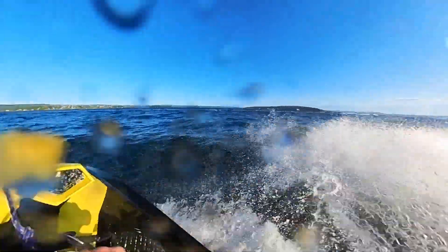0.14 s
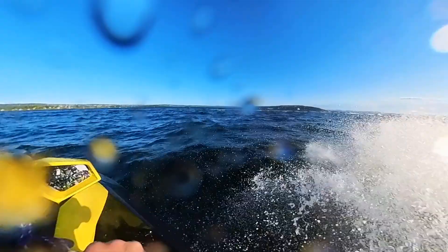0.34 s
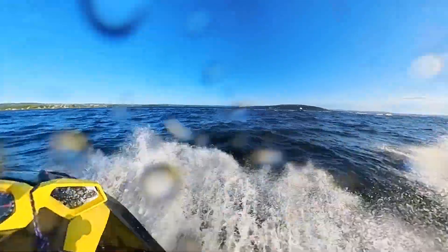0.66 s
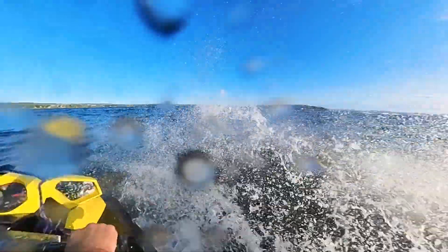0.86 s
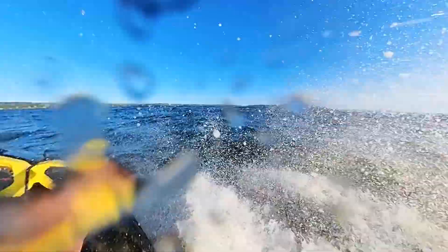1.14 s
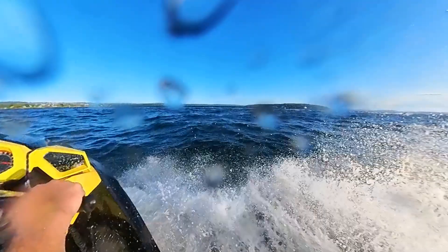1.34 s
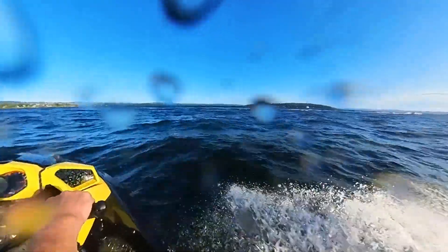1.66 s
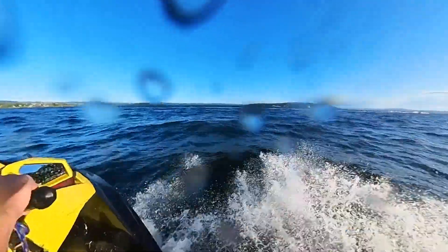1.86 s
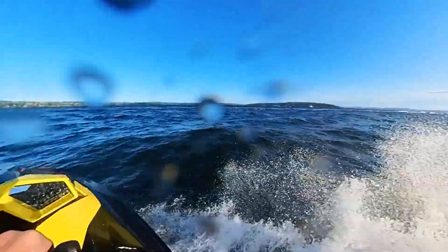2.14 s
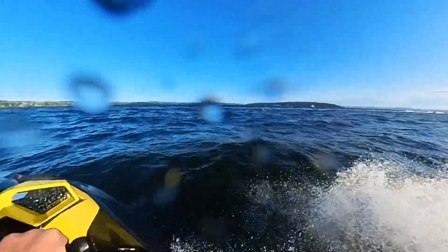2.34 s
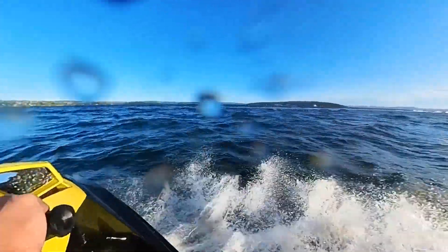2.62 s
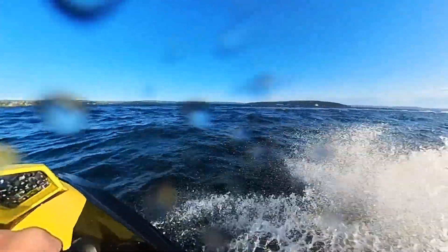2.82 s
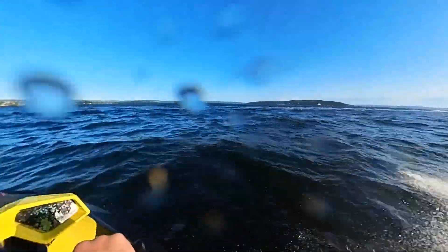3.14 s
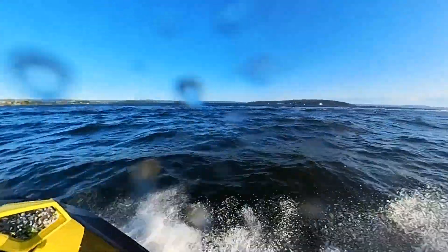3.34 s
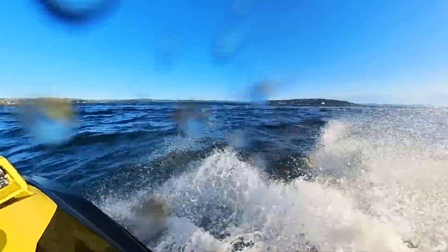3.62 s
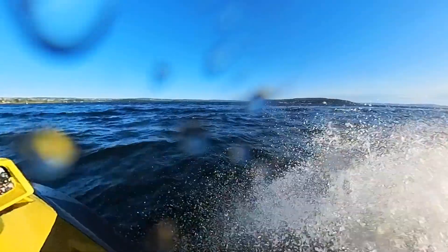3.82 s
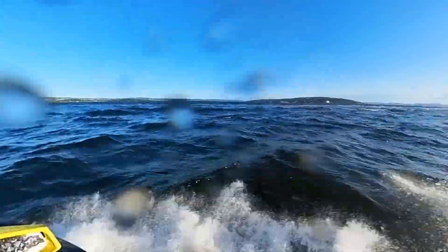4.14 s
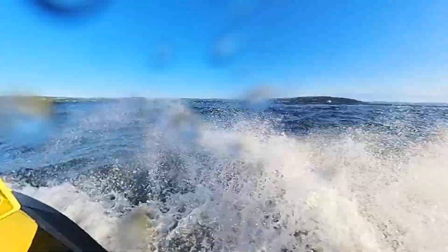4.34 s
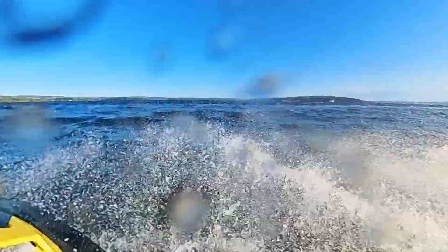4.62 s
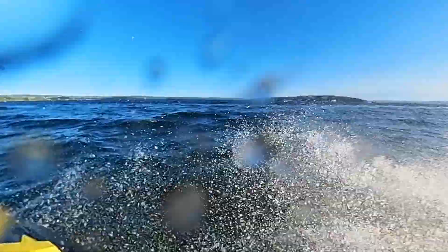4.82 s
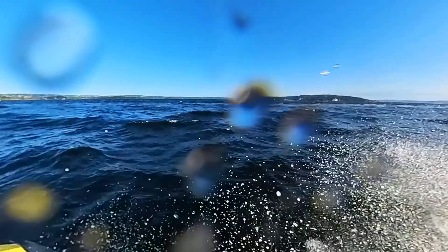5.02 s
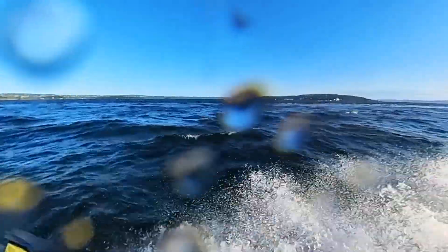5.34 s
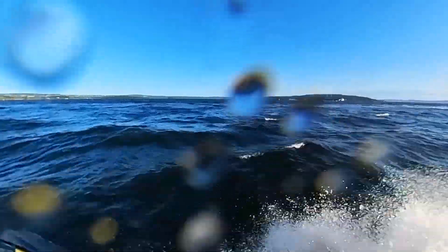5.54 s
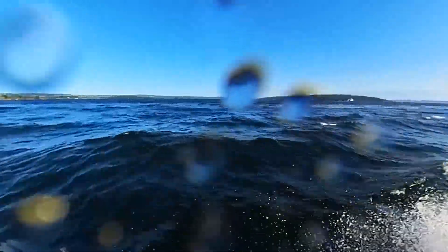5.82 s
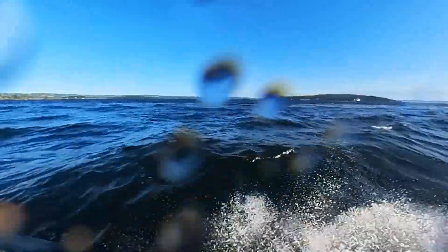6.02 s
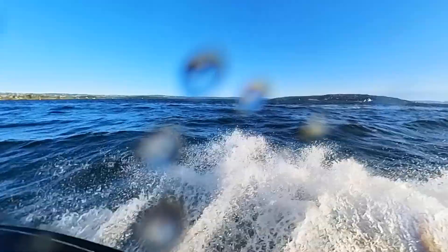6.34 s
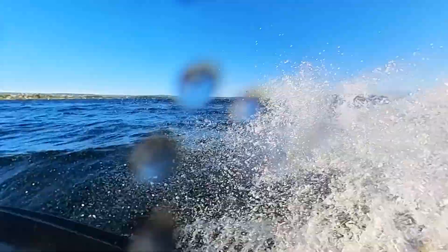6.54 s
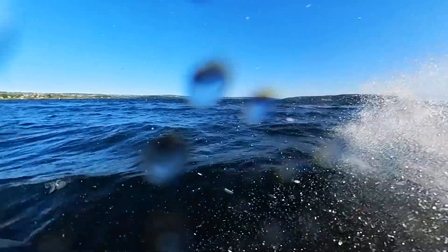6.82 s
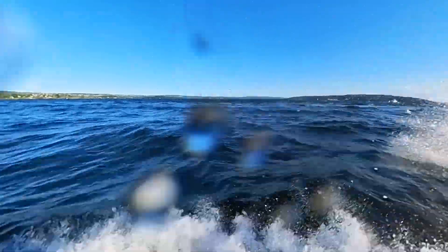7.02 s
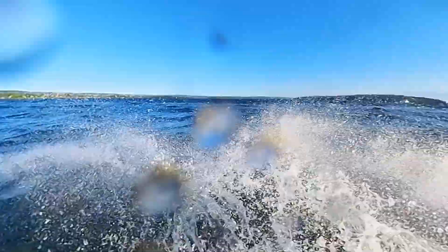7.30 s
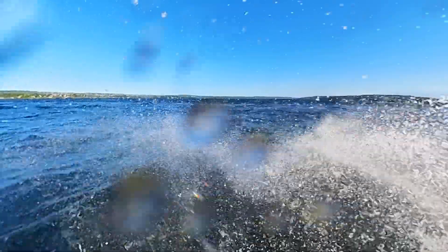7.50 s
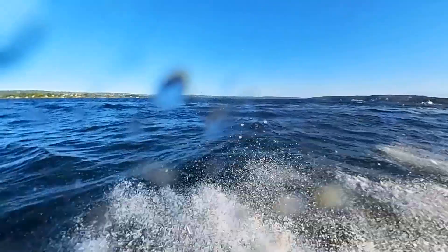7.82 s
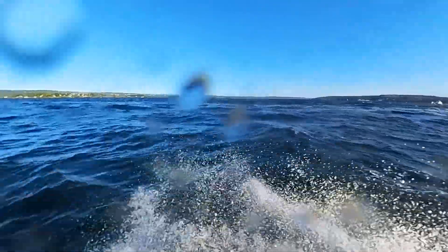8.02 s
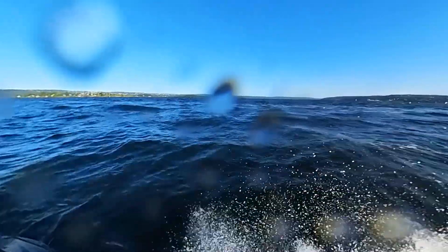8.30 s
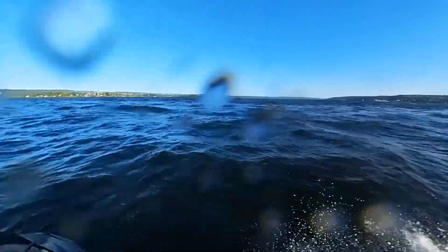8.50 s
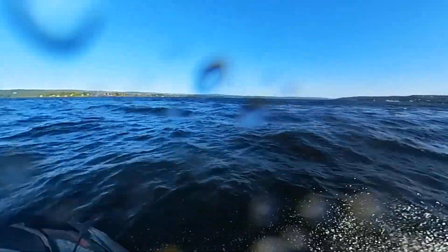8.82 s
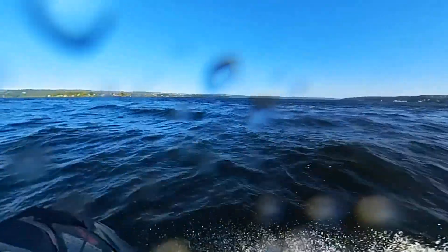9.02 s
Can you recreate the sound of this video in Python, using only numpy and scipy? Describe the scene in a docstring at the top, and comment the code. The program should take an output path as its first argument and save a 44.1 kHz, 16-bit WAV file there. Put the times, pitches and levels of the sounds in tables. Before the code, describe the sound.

A personal watercraft speeds over choppy water, its engine droning and briefly racing amid wind buffeting, dull hull slaps, heavy thuds and faint hissing spray.

```python
"""Personal watercraft on choppy water

It runs fast, heard through a microphone in a waterproof housing on board. The three-cylinder engine
drones as a stack of sine waves and at times races as the jet pump draws air. Shaped noise makes the
wind, the churning chop and the hissing spray. Short fading tones make the slaps against the hull,
its thuds on waves and, mixed with noise, the ticks of drops."""
import sys
import numpy as np
from scipy import signal
from scipy.fft import rfft, irfft, next_fast_len
from scipy.io import wavfile

SR = 44100
rng = np.random.default_rng(int(sys.argv[2]) if len(sys.argv) > 2 else 0)


def persist_wave(psi):
    """Save psi, clipped to +-1, as 16-bit WAV."""
    counts = np.round(np.clip(psi, -1, 1) * 32767).astype(np.int16)
    wavfile.write(sys.argv[1], SR, np.atleast_2d(counts).T)


N = 403956  # samples in the scene

# Engine speed while the pump grips, before races and wobble: [t/s, four-stroke cycle rate f/Hz]
GRIP_SPEED = [(0, 38.5), (0.3, 35.2), (0.47, 36.8), (0.72, 35.4), (0.85, 31.8), (1.0, 35.2), (1.1, 33.3),
              (1.22, 32.4), (1.45, 32.7), (1.62, 37.5), (2.05, 37.3), (2.5, 38.7), (2.94, 38.3),
              (3.2, 35.9), (3.6, 35.3), (4.06, 35.4), (4.3, 35), (4.45, 34), (4.54, 35.3), (4.65, 33.3),
              (5.52, 32.1), (5.73, 34.2), (6.1, 32.2), (6.35, 33), (6.5, 34), (6.75, 33.3), (6.92, 32.4),
              (7.22, 38), (7.36, 35.4), (7.46, 36.2), (7.7, 31.8), (7.85, 38.5), (8.0, 40), (8.2, 38.2),
              (9.16, 38.2)]
# The pump draws air and the engine races: [peak t/s, time from peak to 37 % t/s, added cycle rate f/Hz]
RACES = [(0.1, .1, 3), (1.77, .12, 3), (4.23, .06, 6), (5.11, .16, 8.8)]
# The outlet comes clear of the water and the drone swells: [start t/s, end t/s, gain level/dB]
SWELLS = [(0.06, 0.17, 11), (0.38, 0.78, 6), (1.0, 1.54, 5.5), (3.1, 3.55, 1.5), (3.55, 4.16, 6.5),
          (4.53, 4.66, 8.5), (5.32, 5.45, 10), (5.55, 5.88, 5), (5.88, 6.68, 7.5), (6.68, 6.98, 10),
          (7.33, 7.65, 4.5), (7.8, 8.08, 9.5), (8.08, 8.92, 2), (8.92, 9.16, 10)]
# The hull lifts and the exhaust booms on multiple 4: [start t/s, end t/s, gain level/dB]
BOOMS = [(0.43, 0.8, 15), (3.12, 3.33, 13.5), (3.95, 4.26, 16), (5.05, 5.21, 18.5), (7.06, 7.14, 17.5),
         (8.27, 8.37, 18)]
# The pump grips evenly and the firing note stands out: [start t/s, end t/s, gain level/dB]
THROBS = [(2.75, 3.05, 4), (7.95, 9.0, 3.5)]
# The pump bites again and the exhaust pipe barks on one line:
# [start t/s, end t/s, multiple of the cycle rate, line level/dB before the shake]
BARKS = [(1.035, 1.102, 8, -21), (1.08, 1.547, 9, -30), (3.604, 4.12, 8, -27.5), (4.4, 4.477, 8, -19.5),
         (4.577, 4.705, 9, -26), (6.5, 6.903, 8, -33.5), (6.96, 7.08, 9, -28.5), (7.583, 7.78, 9, -23),
         (8.8, 9.08, 8, -28)]
# Weaker exhaust lines: [multiple of the cycle rate, level/dB before swells and shake]
OVERTONES = [(5, -43.5), (7, -48.5), (10, -45), (12, -50)]

# Air over the microphone, low buffeting before its overall shift and gusts: [t/s, level/dB]
BUFFETING = [(0, -14), (0.65, -30.5), (0.92, -24.5), (1.0, -29), (1.2, -23), (1.55, -24.5), (1.9, -24),
             (2.15, -24.5), (2.48, -29.5), (2.57, -33), (2.66, -21.5), (2.76, -33), (2.86, -23.5),
             (3.25, -21), (3.68, -29), (3.91, -24.5), (4.0, -26.5), (4.42, -26.5), (4.72, -28.5),
             (4.92, -20), (5.2, -30), (5.44, -23), (5.64, -31.5), (5.76, -25.5), (6.3, -28), (6.45, -31.5),
             (6.7, -21), (7.04, -28), (7.34, -23), (7.55, -27.5), (7.83, -23), (8.14, -30), (8.31, -26),
             (9.16, -28.5)]
# Eddies breaking on the port, fine turbulence before its overall shift and gusts: [t/s, level/dB]
EDDIES = [(0.0, -28), (0.81, -35), (0.87, -31), (1.02, -42.5), (1.17, -31), (2.13, -30.5), (2.7, -35.5),
          (3.21, -31.5), (3.42, -36.5), (3.62, -37), (3.96, -31), (4.02, -42.5), (4.17, -45), (4.26, -30.5),
          (4.32, -35), (4.74, -36), (4.92, -22.5), (5.04, -34.5), (5.58, -32), (5.64, -35), (6.09, -31),
          (6.42, -37), (6.48, -34.5), (7.23, -33), (7.56, -39.5), (7.86, -29.5), (8.07, -35), (8.25, -31),
          (9.15, -33)]

# Slaps of chop and water, before muffling and limiter: [t/s, level/dB, pressure pulse f/Hz]
SLAPS = [(0.230, -13, 850), (0.897, -15, 950), (1.069, -15, 800), (1.082, -11.5, 890), (1.180, -12, 750),
         (1.221, -13, 600), (1.275, -12, 900), (1.291, -13, 1020), (1.471, -14.5, 1100), (1.689, -12, 900),
         (1.741, -13.5, 700), (1.775, -10, 650), (1.972, -14, 1000), (1.986, -9.5, 900),
         (2.002, -9.5, 1000), (2.022, -12.5, 820), (2.064, -11, 1100), (2.109, -14, 1200),
         (2.136, -14, 900), (2.155, -11, 1000), (2.225, -10.5, 1150), (2.246, -13, 1200), (2.488, -14, 900),
         (2.682, -8, 900), (2.904, -7, 830), (2.954, -14, 850), (3.018, -13.5, 750), (3.040, -13.5, 650),
         (3.080, -15, 950), (3.198, -5.5, 1000), (3.211, -11, 1100), (3.249, -11, 1300),
         (3.306, -11.5, 900), (3.319, -11, 1100), (3.851, -9.5, 1000), (3.936, -11.5, 950),
         (4.242, -14, 750), (4.256, -11, 1300), (4.277, -13.5, 450), (4.576, -14, 650), (4.615, -9, 1000),
         (4.728, -14.5, 800), (4.894, -7.5, 880), (4.908, -14, 1100), (4.922, -8.5, 780), (4.959, -8, 650),
         (5.086, -9.5, 800), (5.139, -18, 1450), (5.173, -11, 1200), (5.348, -11, 1204),
         (5.455, -13.5, 950), (5.548, -12, 650), (6.333, -6, 380), (6.488, -16, 850), (6.496, -13.5, 1000),
         (6.724, -13, 750), (6.760, -12, 850), (6.890, -13, 905), (6.985, -13.5, 1060), (7.007, -12, 750),
         (7.137, -13.5, 900), (7.246, -13.5, 1000), (7.298, -11.5, 950), (7.620, -14, 1300),
         (7.889, -6.5, 850), (8.645, -13.5, 830), (9.050, -10.5, 1112), (9.076, -12.5, 770)]
# The hull lands on a wave, peak before the limiter: [t/s, level/dB, f/Hz]
THUDS = [(0.745, -13, 250), (0.768, -11, 180), (2.474, -11, 200), (2.636, -8, 260), (2.679, -9, 230),
         (5.166, -10, 140), (6.035, -11, 340), (6.33, -5, 170), (7.819, -11, 240)]

# Sheets of spray from the bow, hiss before its overall shift: [start t/s, length t/s, level/dB]
SHEETS = [(0, 0.09, -56), (0.357, 0.71, -66), (1.14, 0.26, -60), (1.594, 0.34, -61.5), (2.198, 0.84, -65.5),
          (3.195, 0.47, -67.5), (3.569, 0.076, -64.5), (3.7, 0.1, -67.5), (4.27, 0.25, -69), (4.8, .6, -66),
          (5.905, 0.2, -67.5), (6.43, 0.21, -72), (7.128, 0.15, -65.5), (7.615, .2, -64),
          (7.951, 0.23, -70.5), (8.204, .82, -63)]
# Showers of drops after a hard landing, level of the droplets: [start t/s, end t/s, level/dB]
SHOWERS = [(1.09, 1.48, -60), (4.73, 5.45, -64.5), (7.56, 8.0, -65.5)]
# Drops on the housing, starting level before the filter: [t/s, level/dB]
DROPS = [(1.070, -53), (1.143, -47), (1.166, -43), (1.417, -44), (2.474, -48), (4.788, -42), (4.929, -47),
         (4.939, -48), (5.0, -44), (5.087, -49), (5.174, -44), (6.015, -50), (6.735, -51), (7.616, -45),
         (7.699, -48), (7.731, -45), (7.909, -46), (7.957, -48)]
# Water squeezing through the microphone port, before shift and wobble: [t/s, f/Hz, level/dB]
SQUEAK = [(4.33, 6640, -98), (4.355, 6540, -65), (4.37, 6540, -62), (4.39, 7420, -76), (4.405, 6606, -62),
          (4.45, 5843, -73), (4.47, 5740, -120)]

# Colours of the noises; only the shape counts, as the power is evened out: [f/Hz, relative level/dB]
RUMBLE_COLOUR = [(20, -25), (32, -18.5), (45, 4.5), (62, 4), (80, 2), (110, -6), (170, -15), (300, -22.5),
                 (600, -54)]
BUFFET_COLOUR = [(60, -26.5), (100, -2), (160, 2), (260, 0), (330, -3.5), (480, -7.5), (680, -18),
                 (1200, -27), (2500, -59)]
TURBULENCE_COLOUR = [(200, -30.5), (450, 6.5), (650, 4.5), (1000, 1), (1430, -4), (1550, -11), (2000, -25),
                     (2500, -43), (3000, -42.5), (3600, -49), (6000, -60.5)]
HISS_COLOUR = [(900, -5.5), (1800, 14.5), (2400, 1), (2900, -14.5), (3500, 2.5), (4000, -3), (4700, -3.5),
               (5300, -7.5), (6300, -10), (7200, -21.5), (10000, -28.5), (15000, -40)]
MIST_COLOUR = [(3000, -20.5), (6000, -3.5), (7500, 2), (9300, 5.5), (11000, -1), (14000, -3),
               (16000, -10.5)]
WASH_COLOUR = [(250, -10.5), (600, 8), (1000, 6), (1450, -10.5), (2000, -23), (2600, -31), (3200, -43)]


def from_db(db):
    """Turn decibels into a gain."""
    return 10 ** (np.asarray(db) / 20)


def rms_one(x):
    """Scale to unit power."""
    return x / np.sqrt(np.mean(x ** 2) + 1e-20)


def clock():
    """Time of every sample in seconds."""
    return np.arange(N) / SR


def in_time(rows):
    """Draw a curve through each column, one value per sample."""
    s, *columns = np.transpose(rows)
    return [np.interp(clock(), s, column) for column in columns]


def held(rows, fade_s):
    """Each row fades in, holds its value and fades out."""
    t = clock()
    return sum(value * np.clip(.5 + np.minimum(t - start, end - t) / fade_s, 0, 1)
               for start, end, value in rows)


def drift(rate_hz):
    """Smooth random wander with spread 1, made at an eighth of the sample rate."""
    r = np.exp(-16 * np.pi * rate_hz / SR)
    noise = rng.standard_normal(N // 8 + 8002)
    slow = signal.lfilter([1], [1, -2 * r, r * r], noise)[8000:]  # skip the filter's settling
    return np.interp(np.arange(N) / 8, np.arange(len(slow)), rms_one(slow))


def cut(x, hz, kind, order=2):
    """Butterworth filter: keep only a range of pitches."""
    sections = signal.butter(order, hz, kind, fs=SR, output="sos")
    return signal.sosfilt(sections, x + 1e-18)


def colour(x, spectrum):
    """Give a noise its spectrum, at unit power."""
    hz, db = np.transpose(spectrum)
    size = next_fast_len(N)
    bins = np.maximum(np.arange(size // 2 + 1) * SR / size, 1)
    # nothing is left outside the listed range
    gain = from_db(np.interp(np.log(bins), np.log(hz), db, left=-np.inf, right=-np.inf))
    return rms_one(irfft(rfft(x, size) * gain, size)[:N])


def white():
    """Plain noise."""
    return rng.standard_normal(N)


def grains(per_s, spread_db):
    """Random clicks of uneven size, at unit power."""
    sizes = from_db(spread_db * np.minimum(rng.exponential(1, N), 4))
    signs = rng.choice([-1, 1], N)
    struck = rng.random(N) < per_s / SR
    return rms_one(sizes * signs * struck)


def resonance_db(hz, centre_hz, width_hz):
    """Loss of a line that lies off the centre of a resonance."""
    return -10 * np.log10(1 + ((hz - centre_hz) / width_hz) ** 2)


def engine(firing_db=-30.0, firing_hz=116, firing_width_hz=10, fourth_db=-40.5,
           drone_db=-28.5, drone_hz=203, drone_width_hz=22, pipe_db=-39,
           overtone_follows=0.32, shake_db=1.0, wobble=0.004):
    """Exhaust lines locked to the crank; unequal cylinders fill in between the firing harmonics."""
    t = clock()
    cycle_hz = in_time(GRIP_SPEED)[0]
    for s, width, extra in RACES:
        cycle_hz = cycle_hz + extra * np.exp(-((t - s) / width) ** 2)
    turn = 2 * np.pi * np.cumsum(cycle_hz * (1 + wobble * drift(21))) / SR
    swell = held(SWELLS, fade_s=0.056)
    boom = held(BOOMS, fade_s=0.07)
    throb = held(THROBS, fade_s=0.06)

    # two exhaust resonances favour the firing note (3) and the drone (6) as they pass through
    firing = firing_db + throb + resonance_db(3 * cycle_hz, firing_hz, firing_width_hz)
    drone = drone_db + swell + resonance_db(6 * cycle_hz, drone_hz, drone_width_hz)
    lines = [(3, firing), (4, fourth_db + boom), (6, drone)]
    for k in (8, 9):
        barks = [(start, end, db - pipe_db) for start, end, multiple, db in BARKS
                 if round(multiple) == k]
        lines.append((k, pipe_db + held(barks, fade_s=0.05)))
    lines += [(round(k), db + overtone_follows * swell) for k, db in OVERTONES]

    out = np.zeros(N)
    for k, db in lines:
        level = from_db(db + shake_db * drift(26.0))  # water washing over the outlet shakes each line
        out += level * np.sin(k * turn + rng.uniform(0, 2 * np.pi))
    return np.sqrt(2) * out


def wind(buffet_db=5.0, turbulence_db=-2.5, pop_db=-4.0, rumble_db=-33.5, rumble_share=0.55,
         gust_db=0.9, lump_db=2.6, burst_db=2.8):
    """Eddies strike the port: each swells the low buffeting and bursts into turbulence and pops."""
    body, = in_time(BUFFETING)
    fine, = in_time(EDDIES)
    gust = from_db(gust_db * drift(10))
    eddies = np.clip(drift(40), -2.5, 1.6)
    # the rumble partly follows the turbulence
    rumble_level = from_db(rumble_db + rumble_share * (fine - fine.mean()))
    rumble = rumble_level * colour(white(), RUMBLE_COLOUR)
    buffet = colour(white() * from_db(lump_db * eddies), BUFFET_COLOUR)
    pops = from_db(pop_db) * grains(per_s=110, spread_db=1.0)
    bursts = (white() + pops) * from_db(burst_db * eddies)
    turbulence = colour(bursts, TURBULENCE_COLOUR)
    return rumble + gust * (from_db(body + buffet_db) * buffet
                            + from_db(fine + turbulence_db) * turbulence)


def slaps(thump_hz=330, thump_s=0.005, splash_s=0.0055):
    """A quickly fading pressure pulse, a dull hull thump and a ragged splash, muffled by the housing."""
    out, t = np.zeros(N), np.arange(SR // 15) / SR
    ragged = from_db(3 * np.clip(drift(120), -2, 1.3))
    for s, db, hz in SLAPS:
        at = round(s * SR)
        hull_hz = thump_hz * rng.uniform(.8, 1.6)  # a different patch of hull each time
        thump = from_db(-3) * np.sin(2 * np.pi * hull_hz * t) * np.exp(-t / thump_s)
        # the fade is set to 1 at a quarter cycle, the first crest
        pulse = from_db(-1.5) * np.sin(2 * np.pi * hz * t) * np.exp(-1.2 * (hz * t - .25))
        noise = rng.standard_normal(len(t)) * ragged[at:at + len(t)]
        splash = cut(noise, [300, 1400], "band") * np.exp(-t / splash_s)
        out[at:at + len(t)] += from_db(db) * (pulse + thump + splash)
    muffled = cut(out, 1700, "low", order=4)
    return cut(muffled, 2800, "low", order=6)


def thuds(cycles=1.6):
    """The hull lands on a wave: a low knock that swells and dies within a few cycles."""
    out, t = np.zeros(N), np.arange(SR // 10) / SR
    for s, db, hz in THUDS:
        at = round(s * SR)
        age = 2 * hz * t / cycles  # 1 at the fullest moment
        out[at:at + len(t)] += from_db(db) * age * np.exp(1 - age) * np.sin(2 * np.pi * hz * t)
    return out


def chop(wash_db=-46.5, gather_s=0.025, settle_s=0.029):
    """Water gathers before each slap, then churns and pops along the hull; harder slaps throw more."""
    t = clock()
    typical_db = np.mean([db for s, db, hz in SLAPS])
    power = np.zeros(N)
    for s, db, hz in SLAPS:
        distance = np.maximum((s - t) / gather_s, (t - s) / settle_s)
        power += from_db(db - typical_db) * np.exp(-distance)
    pops = from_db(3) * grains(per_s=220, spread_db=1.5)
    return from_db(wash_db) * np.sqrt(power) * colour(white() + pops, WASH_COLOUR)


def spray(hiss_db=11.0, mist_db=-13.0, patter_db=-12.0, flicker_db=0.6, mist_growth=.25,
          wake_db=-68.5, attack_s=0.12, release_s=0.12):
    """Sheets of spray rise, hold and fall over the wake's hiss; heavier ones carry more fine mist."""
    t = clock()
    power = from_db(wake_db) ** 2
    for s, length, db in SHEETS:
        rise = np.clip(1 + (t - s) / attack_s, 0, 1)  # full at the listed start
        fall = np.exp(-np.maximum(t - s - length, 0) / release_s)
        power = power + (from_db(db) * rise * fall) ** 2
    hiss = 10 * np.log10(power)
    mist = hiss + mist_db + mist_growth * (hiss - hiss.mean())
    flicker = from_db(flicker_db * drift(31))
    patter = from_db(patter_db) * grains(per_s=330, spread_db=1.0)
    sheet = from_db(hiss + hiss_db) * colour(white() + .7 * patter, HISS_COLOUR)
    return flicker * (sheet + from_db(mist) * colour(white() + patter, MIST_COLOUR))


def showers(film_db=-1.0, droplet_top_hz=5200):
    """Thrown water falls as dense droplets and runs off the housing in a fizzing film."""
    t = clock()
    fall = np.zeros(N)
    for start, end, db in SHOWERS:
        swell = np.clip((t - start) / .07, 0, 1)
        thin_out = np.clip(4 * (end - t) / (end - start), 0, 1)  # over the last quarter
        fall += from_db(db) * swell * thin_out
    patter = grains(per_s=330, spread_db=3.3)
    droplets = rms_one(cut(patter, [2000, droplet_top_hz], "band"))
    fizz = white() * from_db(3 * np.clip(drift(60), -2, 2))
    film = rms_one(cut(fizz, [2000, 3600], "band"))
    return fall * (droplets + from_db(film_db) * film)


def drops(decay_s=0.0024, squeak_db=-2.5):
    """Drops tick on the housing, each ringing at its own pitch; once a water film squeaks in the port."""
    ticks, t = np.zeros(N), np.arange(SR // 50) / SR
    for s, db in DROPS:
        at = round(s * SR)
        ring = np.sin(2 * np.pi * rng.uniform(3500, 5000) * t)
        tick = (ring + rng.standard_normal(len(t))) / np.sqrt(2)
        ticks[at:at + len(t)] += from_db(db) * np.exp(-t / decay_s) * tick
    hz, db = in_time(SQUEAK)
    turn = 2 * np.pi * np.cumsum(hz * (1 + .025 * drift(200))) / SR
    squeak = from_db(db + squeak_db + 4 * drift(90)) * np.sin(turn)
    started = clock() > SQUEAK[0][0]
    return cut(ticks, [2800, 8500], "band") + squeak * started


def scene():
    """Everything meets at one microphone."""
    craft = engine() + wind() + slaps() + thuds()
    water = chop() + spray() + showers() + drops()
    return (craft + water)[None]


def record(dry, threshold_db=-10.5, release_db_per_s=75, attack_s=0.0009, cutoff_hz=15100):
    """A limiter ducks everything at loud peaks and recovers quickly; the highest treble is cut."""
    over = np.maximum(20 * np.log10(np.abs(dry) + 1e-9) - threshold_db, 0)
    # a running maximum on a rising ramp makes each peak fall back at a steady rate
    ramp = release_db_per_s * np.arange(N) / SR
    falling = np.maximum.accumulate(over + ramp, axis=-1) - ramp
    duck_db = cut(falling, 1 / (2 * np.pi * attack_s), "low")
    top_cut = signal.ellip(10, .1, 70, cutoff_hz, fs=SR, output="sos")
    return signal.sosfilt(top_cut, dry * from_db(-duck_db))


dry = scene()
out = record(dry)
persist_wave(out)
```